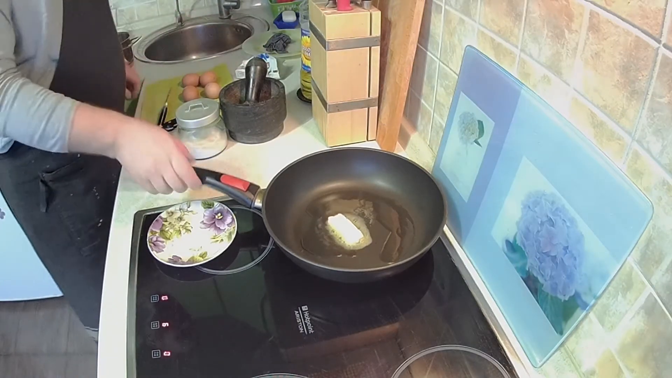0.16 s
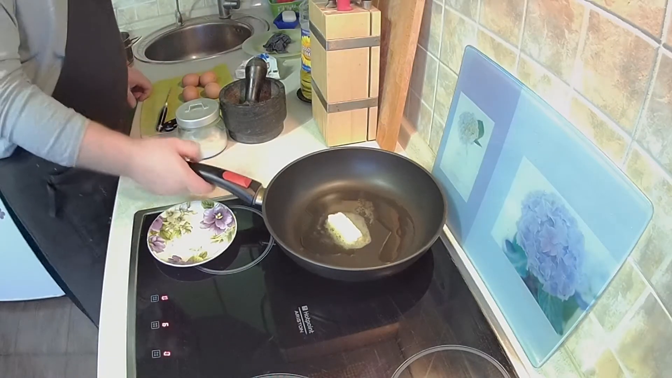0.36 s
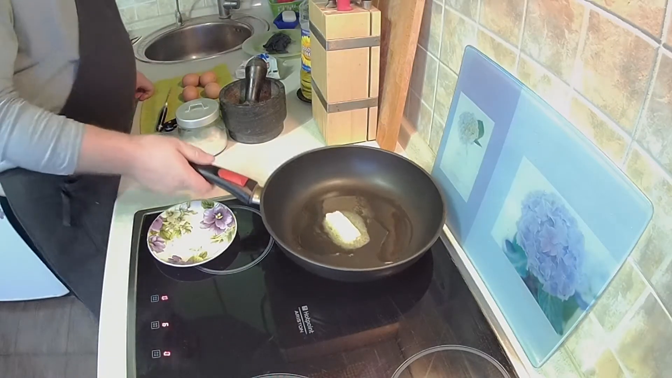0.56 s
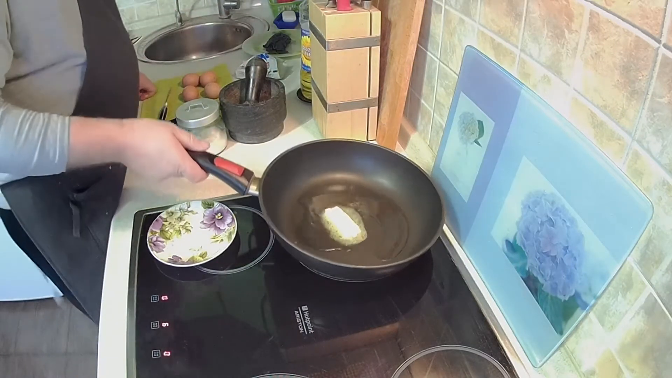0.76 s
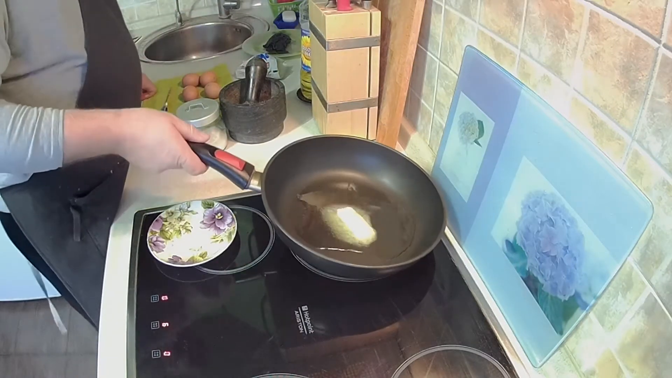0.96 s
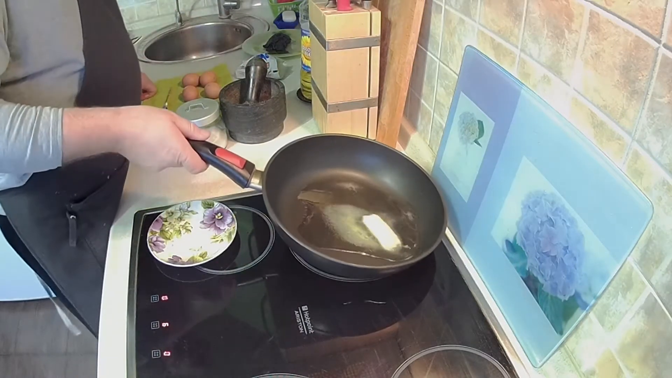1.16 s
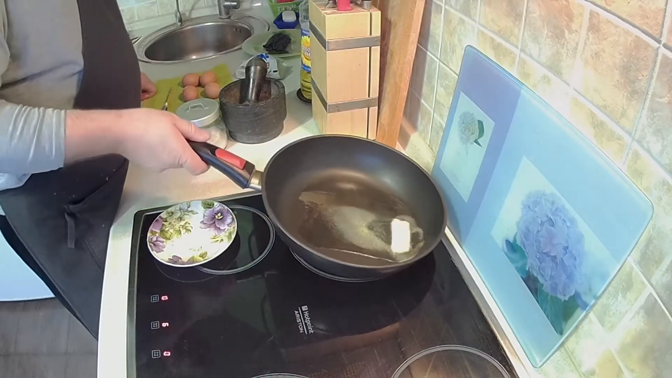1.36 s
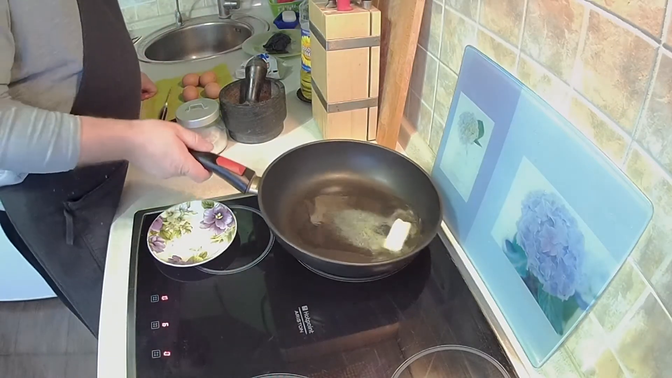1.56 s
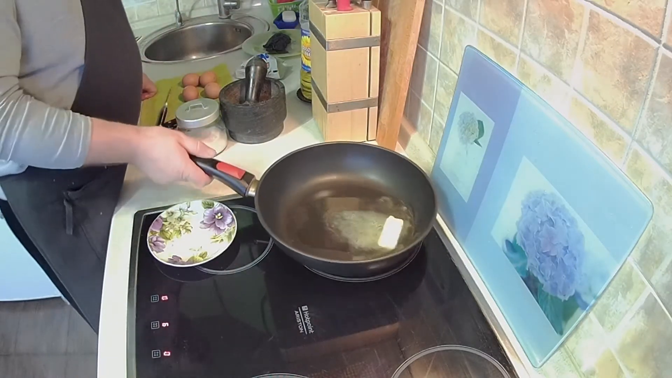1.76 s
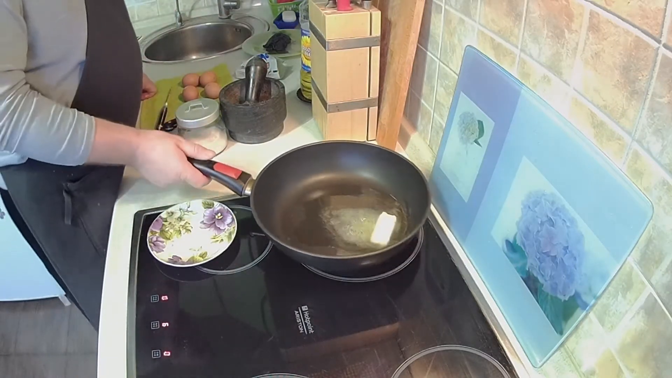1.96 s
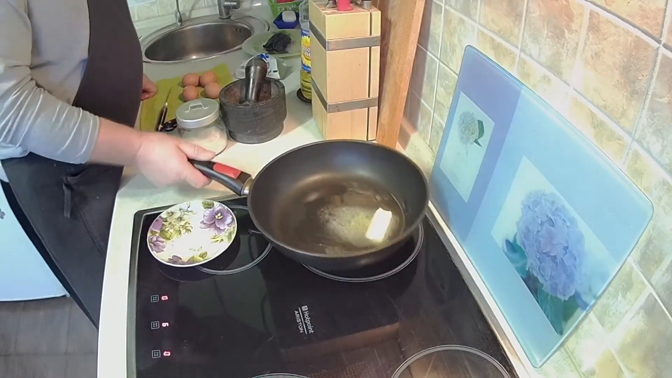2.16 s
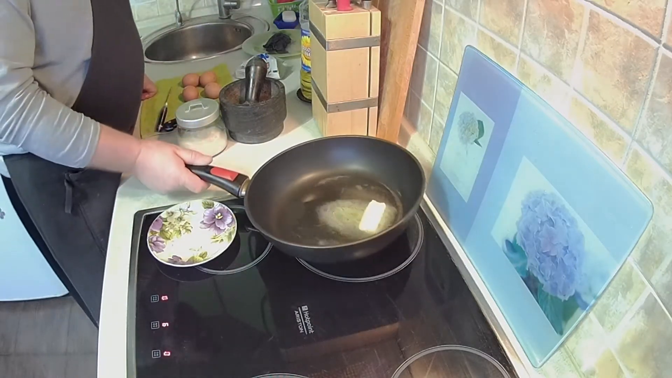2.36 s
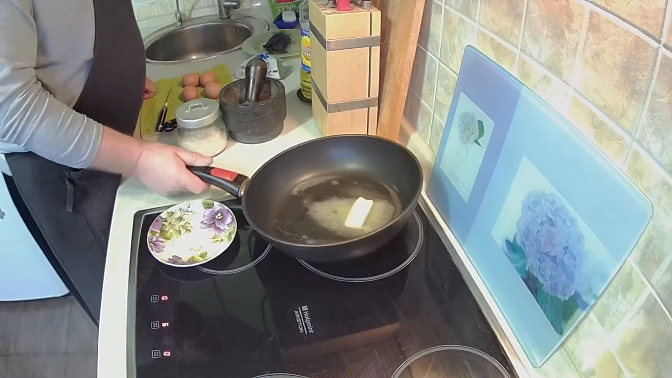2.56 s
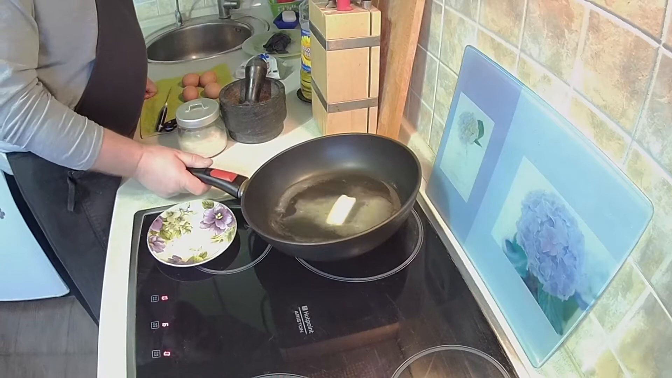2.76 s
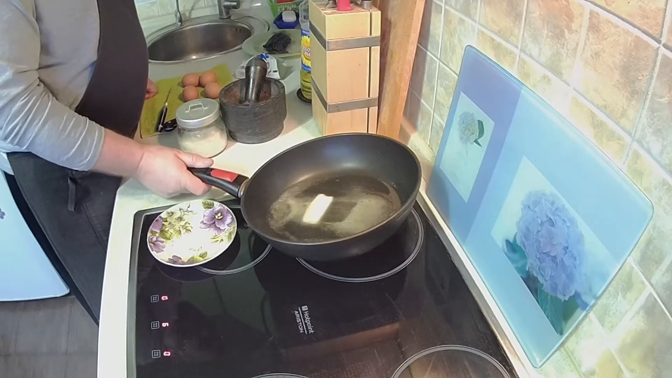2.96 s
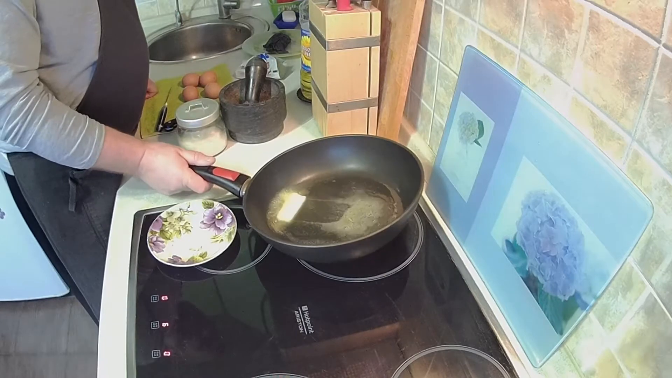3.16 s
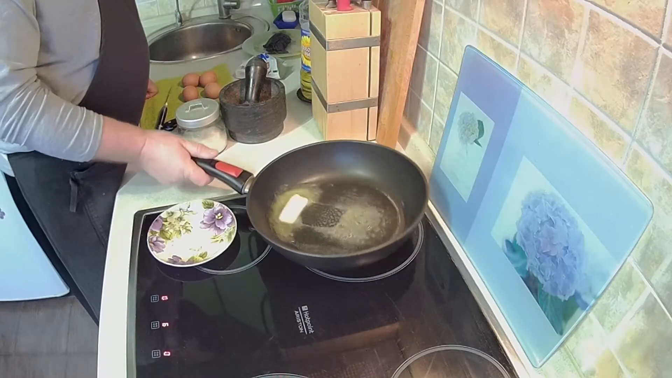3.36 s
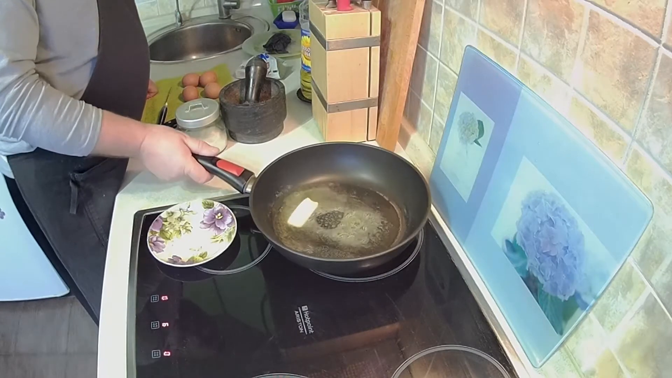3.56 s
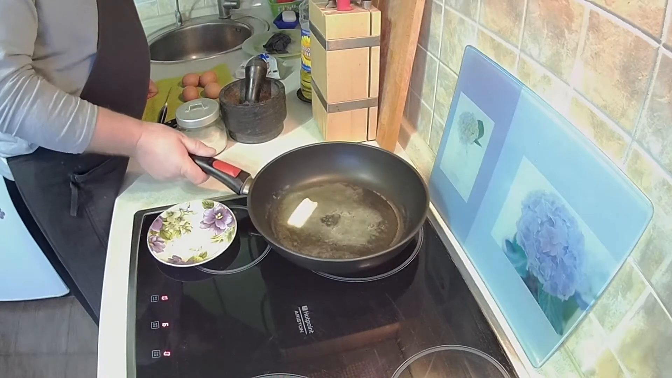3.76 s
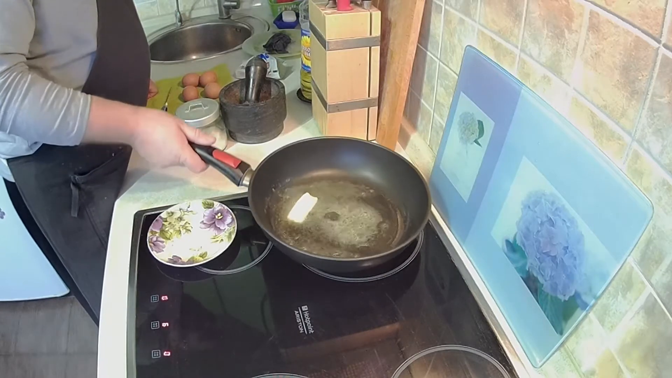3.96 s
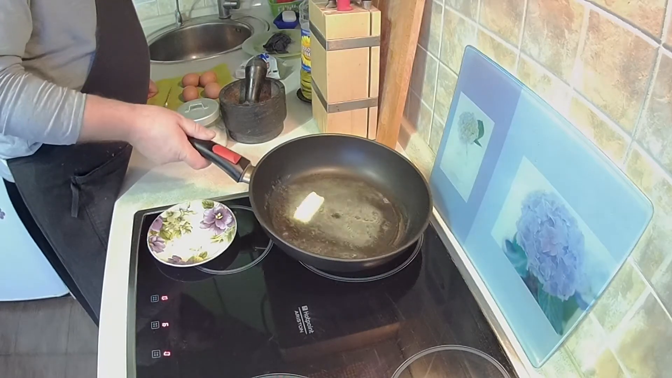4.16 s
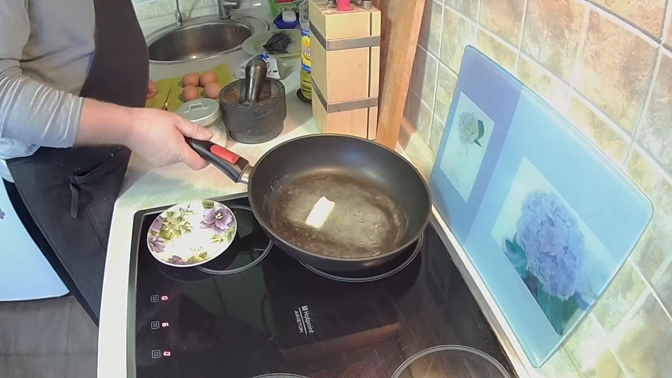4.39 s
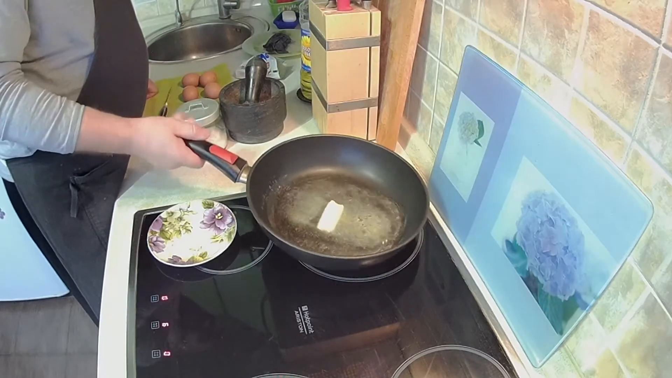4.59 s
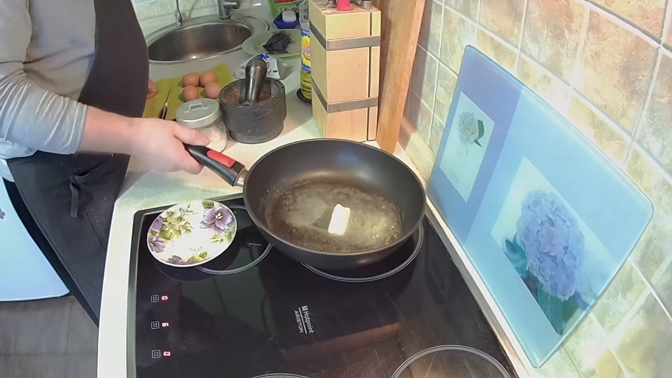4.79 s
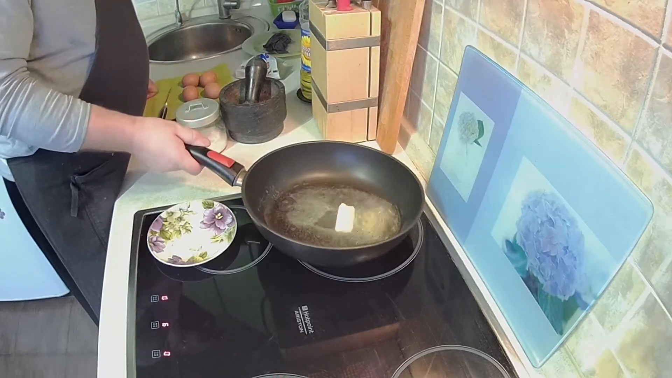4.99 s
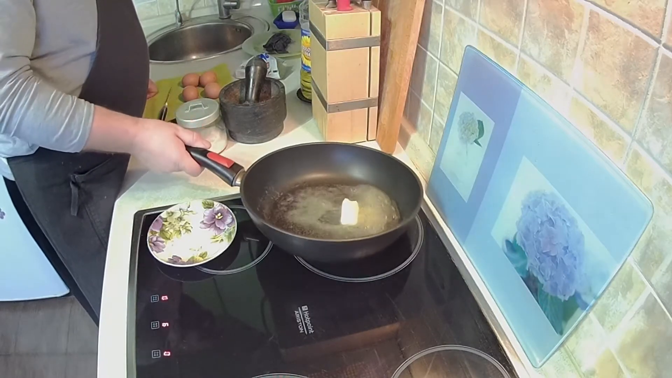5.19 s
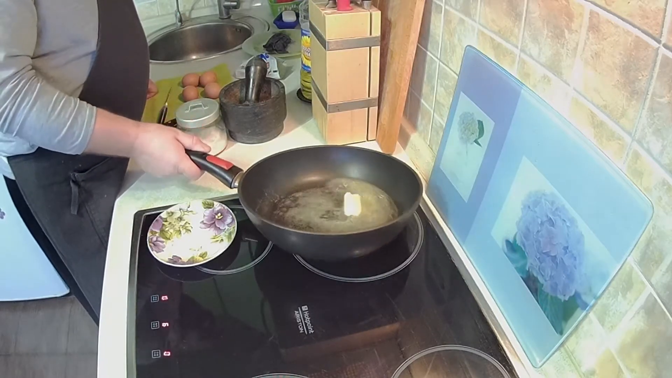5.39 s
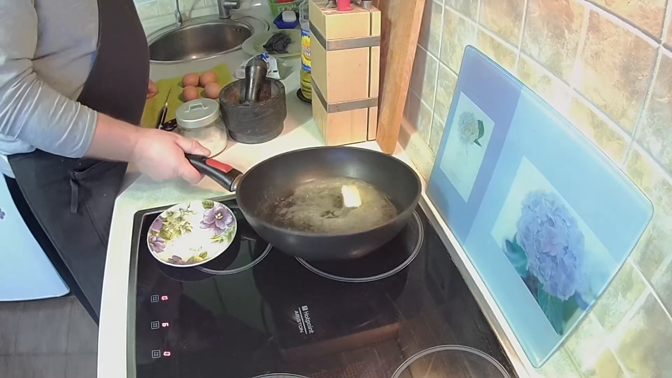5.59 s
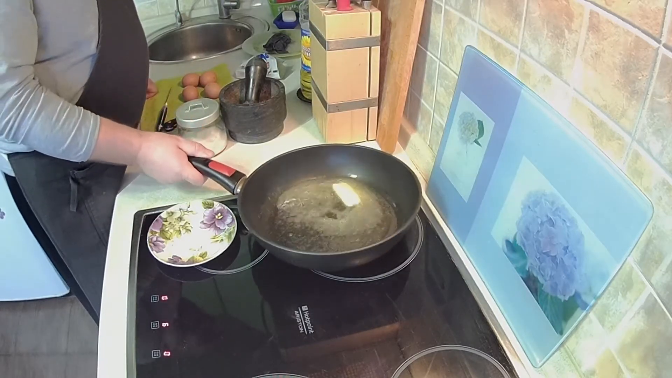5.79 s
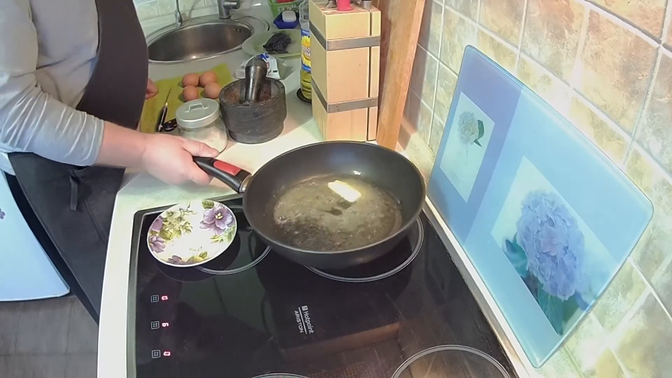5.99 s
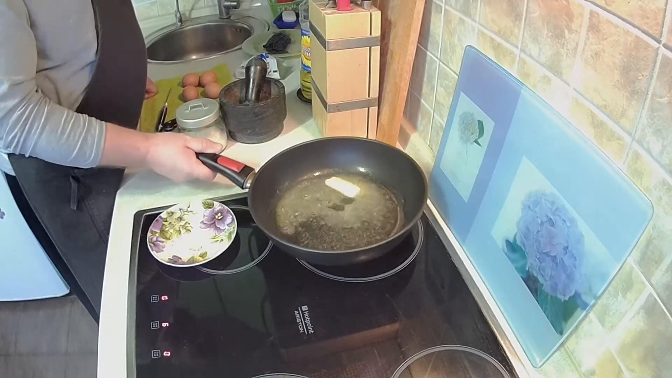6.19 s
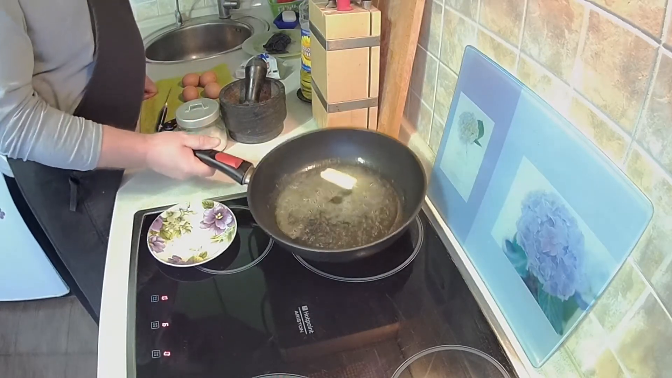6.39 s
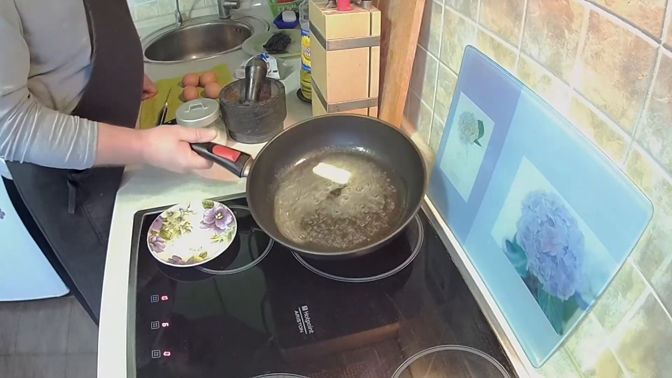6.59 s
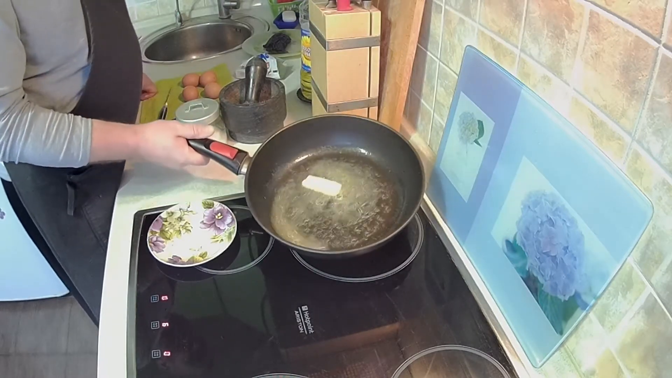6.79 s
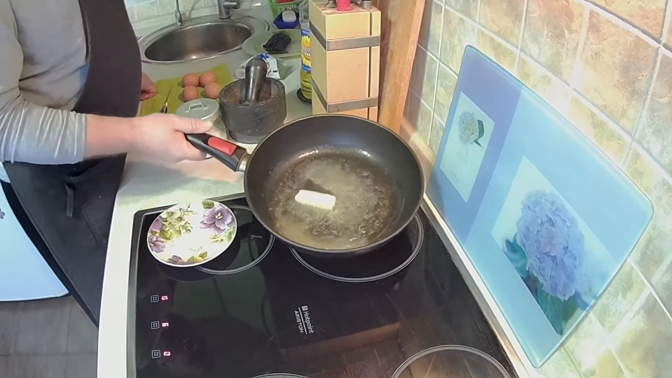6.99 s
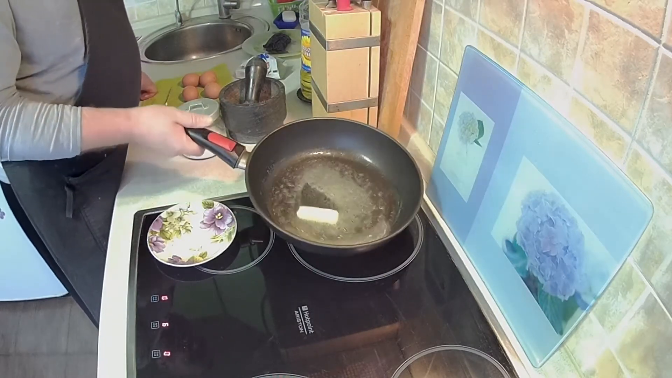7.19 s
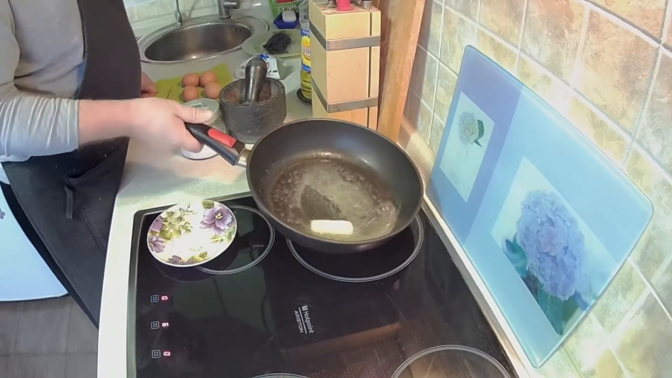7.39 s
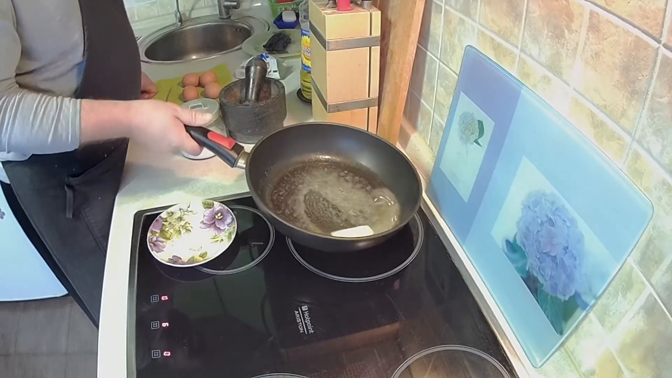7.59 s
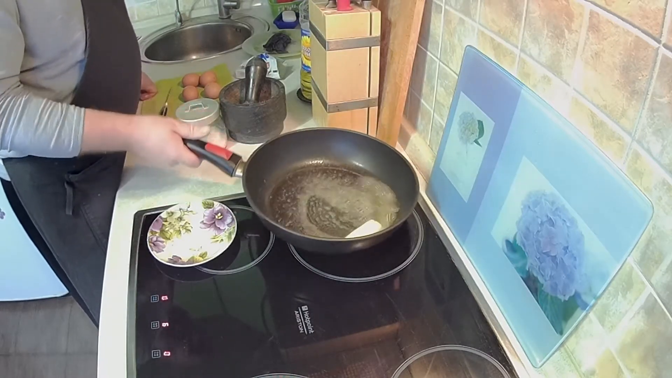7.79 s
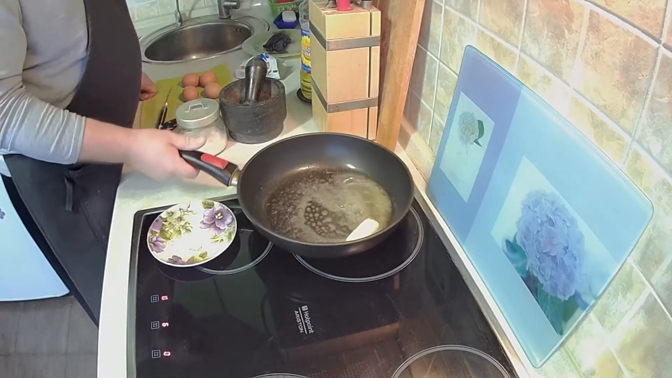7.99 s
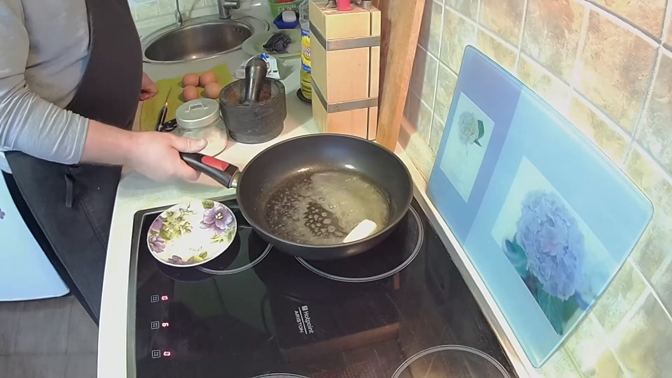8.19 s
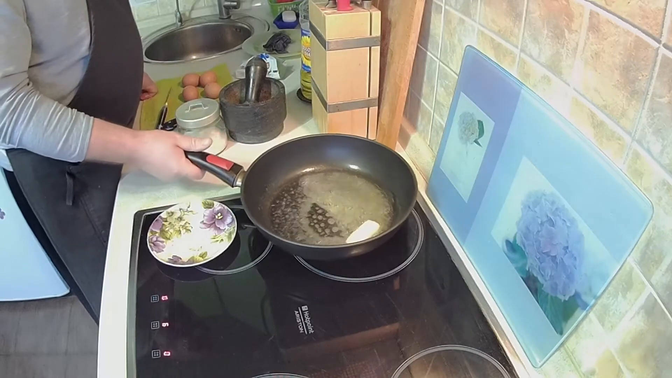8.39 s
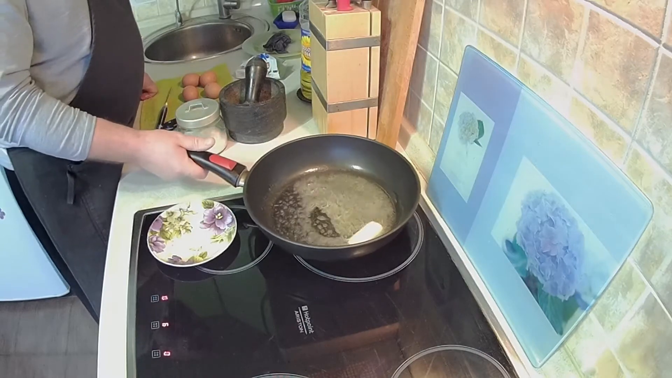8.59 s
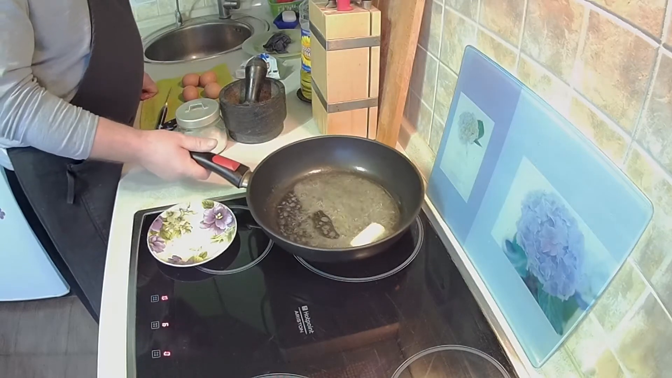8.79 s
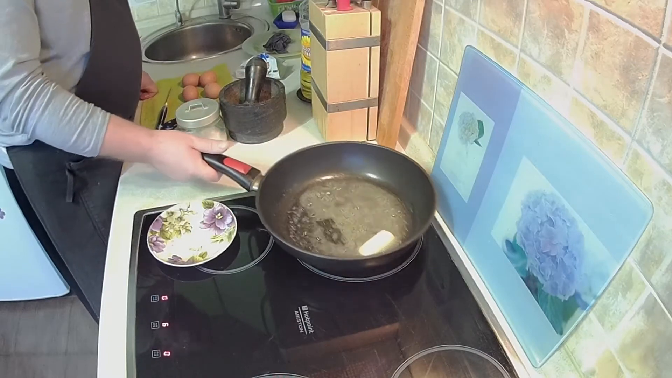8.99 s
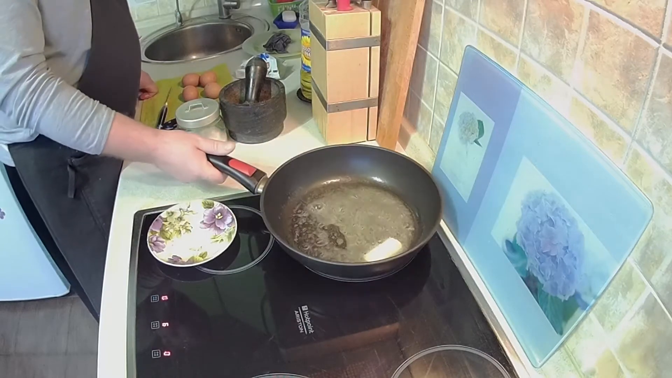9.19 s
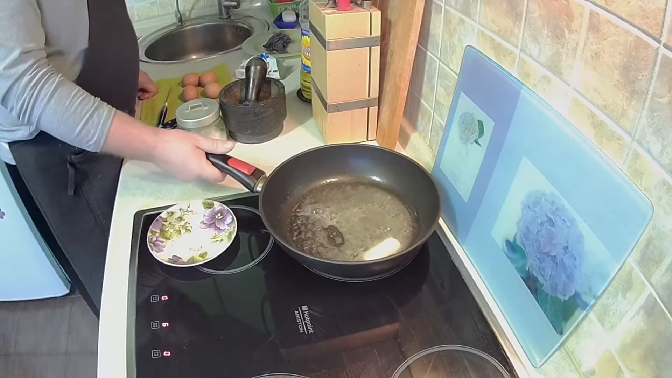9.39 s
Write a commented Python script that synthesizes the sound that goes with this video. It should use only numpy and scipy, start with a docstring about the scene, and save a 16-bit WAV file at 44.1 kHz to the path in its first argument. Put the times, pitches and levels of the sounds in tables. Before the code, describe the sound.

Butter slides and sizzles in a hot pan in a small tiled kitchen, crackling, popping and spitting while the pan scrapes and bumps the hob.

```python
"""Butter begins melting in a hot pan over a glass hob: faint bubble pops, modelled as ringing cavities.
From about 1.2 s it slides onto hot metal: flash boiling adds fizz, crackle and spitting, as filtered random clicks.
The frying flares, lulls and pops harder; meanwhile the pan rubs and bumps, ringing modes of metal and hob.
A lull thins it near 7 s, the loudest pops follow, and a heavy bump comes at 9 s.
Throughout, low handling noise rustles, and a small tiled kitchen adds echoes and a short diffuse tail."""
import sys
import numpy as np
from scipy import signal
from scipy.io import wavfile
from scipy.ndimage import uniform_filter1d, map_coordinates

SR = 44100
rng = np.random.default_rng(int(sys.argv[2]) if len(sys.argv) > 2 else 0)


def bounce(signal):
    """Save signal as a 16-bit WAV file at the path given by the first command-line argument."""
    frames = np.transpose(np.atleast_2d(signal))
    limited = np.clip(frames, -1, 1)
    pcm = np.round(limited * 32767).astype(np.int16)
    wavfile.write(sys.argv[1], SR, pcm)


N = 416744
TIME = np.arange(N) / SR


# spectrum of the pooled fat's bubbles: (frequency [Hz], relative density [dB per Hz])
BUBBLING = [(1300, -60), (1750, -43), (2050, -15.5), (2400, -7), (3050, -22.5), (3500, -7), (4050, 4),
            (4450, 8), (5200, -19.5), (6150, -24), (7000, -54), (8500, -18)]
# resonances of the dish that every burst excites: (frequency [Hz], bandwidth [Hz], relative level [dB])
DISH = [(2670, 670, -10.5), (4460, 380, 7)]
# spectrum of the small bubbles in the froth: (frequency [Hz], relative density [dB per Hz])
FROTH = [(3000, -43.5), (4400, -3.5), (5200, -6.5), (6100, -2), (6600, -7.5), (7200, -12.5), (9000, -26)]


def bubbling():
    """Cavity resonance: large bubbles burst in the pooled fat and ring the dish; small ones burst in froth."""
    breaks = bursts(per_s=3800, spread_db=3.6, clump_db=4.8)
    pool = unit(colour(grains(breaks, low_hz=1826, high_hz=5834, ring_s=0.011), BUBBLING))

    rings = np.zeros(N)
    for hz, width_hz, db in DISH:
        resonator = signal.iirpeak(hz, hz / width_hz, SR)
        rings += amp(db) * unit(signal.lfilter(*resonator, breaks))
    dish_band = signal.butter(4, [1800, 5400], "bandpass", fs=SR, output="sos")
    dish = unit(signal.sosfilt(dish_band, rings))

    froth_breaks = bursts(per_s=2600, spread_db=4.0, clump_db=6.0)
    froth = colour(grains(froth_breaks, low_hz=4560, high_hz=7970, ring_s=0.0063), FROTH)

    large = frying_gain(db=-57.0, boil=0.8, fizz=0.066, flare=1) * steadied(pool)
    ringing = frying_gain(db=-62.5, boil=1.0, fizz=-0.087, flare=1) * steadied(dish)
    small = frying_gain(db=-56.0, boil=1.0, fizz=0.41, flare=0.95) * steadied(froth)
    return large + ringing + small


# spectrum of the crackle: (frequency [Hz], relative density [dB per Hz])
CRACKLE = [(300, -7), (750, -19), (1000, -25), (1400, -5.5), (1750, 4.5), (2100, 2.5), (2400, 5),
           (3080, -4), (3400, 6), (4400, 3.5), (5150, -9), (6100, 9), (7100, -15), (10000, -11)]
# spectrum of the fine fizz: (frequency [Hz], relative density [dB per Hz])
FIZZ = [(3000, -67), (4500, -29), (6100, -22), (7100, -7), (7900, -2.5), (9300, 8), (10600, 0.5),
        (11700, 6), (14100, 5), (15200, 3), (15900, -43)]
BUSY_SHARE = 0.93  # harder frying bursts more often: dB of rate for each dB of level
TICK_SHARE = 1.15  # spray ticks against the fine bubbles
FIZZ_SWAY_DB, FINEST_FLICKER_DB = 1.1, 2.2  # rms swing of the whole fizz, and of the hiss's top
CRACKLE_TOP_HZ = 7400  # without fresh butter on the metal the crackle loses its top
FINEST_HZ, FINEST_SHARE = 10500, 0.36  # weak hiss is duller: its top falls by this many dB more per dB


def sizzle():
    """Flash boiling: water turns to steam on the metal as wide crackle, fine bubble hiss and ticks of spray."""
    boil_db, fizz_db = curve(BOILING) - STEADY_BOIL_DB, curve(FIZZING) - STEADY_FIZZ_DB
    boil_rate = amp(BUSY_SHARE * np.clip(boil_db, -8, 8))
    fizz_rate = amp(BUSY_SHARE * np.clip(fizz_db, -3, 8))

    coarse = unit(bursts(per_s=4200 * boil_rate, spread_db=2.9, clump_db=5.2))
    fine_breaks = bursts(per_s=12000, spread_db=2.4, clump_db=1.5)
    fine = grains(fine_breaks, low_hz=5180, high_hz=16040, ring_s=0.003)
    spray = bursts(per_s=900 * fizz_rate, spread_db=4.0, clump_db=2.0)
    ticks = steadied(droplets(spray))

    crackle = steadied(colour(steadied(coarse) + 0.29 * ticks, CRACKLE))
    crackle *= frying_gain(db=-57.5, boil=0.87, fizz=0.65, flare=3.9)
    fizz = steadied(colour(fine + TICK_SHARE * ticks, FIZZ))
    fizz *= frying_gain(db=-47.5, boil=0, fizz=1.0, flare=0.13)
    fizz *= spurting() * amp(FIZZ_SWAY_DB * drift(per_s=5.4))

    weak_db = np.minimum(fizz_db, 0)
    hiss = fizz + shelf(crackle, CRACKLE_TOP_HZ, 0, weak_db)
    flicker_db = FINEST_FLICKER_DB * drift(per_s=80)
    return shelf(hiss, FINEST_HZ, 0, FINEST_SHARE * weak_db + flicker_db)


def droplets(clicks):
    """Impulse and decaying noise: each droplet explodes with a click, and its spray hisses a moment longer."""
    power = signal.lfilter([1], [1, -np.exp(-1 / (0.00052 * SR))], clicks ** 2)
    return clicks + 0.27 * np.sqrt(power) * rng.standard_normal(N)


SPURTS_PER_S, SPURT_S = 45, 0.006  # mean rate, and decay time of the power
SPURT_SPREAD_DB, SPURT_DB = 3.2, -2  # spread of sizes, and the smallest size against the even hiss


def spurting():
    """Amplitude modulation: an even gain with a flash at every spurt of steam, sudden and quick to die."""
    size = amp(SPURT_DB + SPURT_SPREAD_DB * np.minimum(rng.exponential(1, N), 3.5))
    spurts = size * (rng.random(N) < SPURTS_PER_S / SR)
    power = signal.lfilter([1], [1, -np.exp(-1 / (SPURT_S * SR))], spurts ** 2)
    return unit(np.sqrt(1 + power))


# the largest bubbles bursting: (time [s], direct peak level [dB], starting pitch [Hz])
POPS = [(0.1377, -35, 4370), (0.2886, -39, 4470), (0.3372, -42, 4510), (0.544, -45, 6300),
        (0.562, -42, 4350), (0.603, -50, 2350), (0.668, -46, 4360), (0.736, -44, 4250), (0.7936, -41, 4370),
        (0.8631, -43, 3890), (0.91, -44, 3950), (0.943, -42, 3870), (0.9923, -45, 4280),
        (1.5961, -40, 4400), (1.7937, -43, 4090), (1.8585, -37, 4130), (2.373, -32, 4750),
        (3.2576, -28, 5940), (3.5054, -29, 4200), (3.8128, -19, 4310), (3.9005, -26.5, 6000),
        (4.0088, -26, 4700), (4.3688, -25, 6140), (4.6668, -30, 4500), (4.6878, -25, 4490),
        (5.287, -30, 5880), (5.7513, -32, 3560), (5.7675, -33, 3900), (5.7705, -32, 3500),
        (5.783, -22, 4000), (5.915, -34, 2440), (6.3586, -31, 3890), (6.4188, -27, 5860),
        (7.0642, -35, 4580), (7.1523, -15.5, 3814), (7.621, -24, 6110), (7.7484, -23, 4400),
        (8.0862, -26, 3280), (8.1325, -14.5, 4450), (8.478, -20, 4020), (8.5623, -28, 4640),
        (8.8897, -30, 5090), (9.1146, -27, 4720), (9.116, -34, 2300), (9.3545, -27, 4650)]
# spectrum of the skin's snap: (frequency [Hz], relative density [dB per Hz])
SNAP = [(1000, -25), (2000, 2), (3000, -1), (4300, 13), (5200, 4), (6200, 5), (7200, -7), (10000, -28),
        (16000, -100)]
POP_CYCLES = 28  # the ring time in cycles of the pitch, so low bubbles last longer
SNAP_DB, SNAP_S = -4, 0.0026  # the tearing skin: level against the pip, and decay time


def pops():
    """Cavity resonance and rupture: each large bubble gives a pitched pip and a snap of its tearing skin."""
    out, t = np.zeros(N), TIME[:SR // 25]
    for s, db, hz in POPS:
        noise = rng.standard_normal(len(t))
        snap = topped(colour(noise * np.exp(-t / SNAP_S), SNAP))
        pip = topped(bubble(hz, POP_CYCLES / hz, glide=0.058))
        add(out, s, amp(db) * topped(pip + amp(SNAP_DB) * snap))
    return out


# the loudest droplets of water spitting: (time [s], level [dB] of the blast's peak before body and lulls)
SPITS = [(1.2331, -38), (1.3079, -37), (1.3688, -36), (2.066, -31), (2.155, -30), (2.266, -30),
         (2.3785, -26), (2.7754, -29), (3.3084, -25), (3.699, -22), (3.8045, -24), (3.9215, -19),
         (3.945, -21), (4.0455, -21.5), (4.0775, -24), (4.1055, -22.5), (4.2223, -25), (4.4009, -23),
         (4.416, -23), (5.3117, -28), (5.448, -28), (5.8112, -27), (6.504, -28), (6.6079, -24),
         (6.6297, -27), (6.8523, -20.5), (6.9581, -25.5), (7.1949, -25), (7.3148, -25), (7.52, -27),
         (7.672, -26), (8.1657, -27), (8.6058, -26), (9.3754, -31)]
SPRAY_S = 0.006  # decay time


def spits():
    """Explosive vaporization: a blast and its longer spray, with a little body where the fat is boiling."""
    out, t = np.zeros(N), TIME[:SR // 40]
    for s, db in SPITS:
        envelope = np.exp(-t / 0.0005) + 0.33 * np.exp(-t / SPRAY_S)
        blast = rng.standard_normal(len(t)) * envelope
        boil_db = np.interp(s, *np.transpose(BOILING)) - STEADY_BOIL_DB
        body = 0.27 * amp(min(boil_db, 0)) * topped(colour(blast, CRACKLE))
        add(out, s, amp(db) * topped(topped(colour(blast, FIZZ)) + body))
    return out


# water breaks out of the butter and the frying flares: (time [s], rise [dB] before each layer's share)
FLARES = [(1.593, 6), (2.057, 2.5), (3.255, 2.5), (4.68, 1.1), (5.912, 1.5), (7.15, 3)]
FLARE_S = 0.1  # decay time


def flaring():
    """Transient excitation: each flare starts at once and dies away exponentially; in dB."""
    return sum(db * (TIME >= s) * np.exp(-abs(TIME - s) / FLARE_S) for s, db in FLARES)


# boiling of the pooled fat, read against its steady level: (time [s], level [dB])
BOILING = [(0, -54.5), (0.35, -58), (0.48, -63.5), (0.65, -58), (0.95, -62), (1.12, -79.5), (1.5, -76.5),
           (1.8, -60.5), (2.35, -47.5), (3.1, -56.5), (3.65, -47.5), (4.05, -43.5), (4.65, -49.5),
           (4.9, -50), (5.55, -53.5), (5.9, -51.5), (6.6, -49.5), (7.0, -51.5), (7.25, -52.5), (7.85, -52),
           (8.45, -48.5), (9.45, -45)]
# fine sizzle as butter slides onto hot metal, read against its steady level: (time [s], level [dB])
FIZZING = [(0, -66.5), (0.3, -86), (1.02, -77), (1.24, -49.5), (2.1, -48.5), (2.45, -50), (3.2, -52),
           (3.7, -42), (4.4, -42.5), (4.8, -47.5), (5.3, -46.5), (5.65, -51.5), (6.0, -48.5), (6.65, -46),
           (7.05, -52.5), (7.22, -47.5), (7.7, -44), (8.2, -50.5), (8.65, -51), (8.97, -62.5), (9.15, -52),
           (9.45, -60.5)]
STEADY_BOIL_DB, STEADY_FIZZ_DB = -52, -47


def frying_gain(db, boil, fizz, flare):
    """Level superposition: a steady level in dB, plus shares of the boiling, fizzing and flares, as a gain."""
    boil_db = boil * (curve(BOILING) - STEADY_BOIL_DB)
    fizz_db = fizz * (curve(FIZZING) - STEADY_FIZZ_DB)
    return amp(db + boil_db + fizz_db + flare * flaring())


# fat runs off the hot spot and deeper bubbles die away: (middle time [s], half length [s], level [dB])
LULLS = [(0.457, 0.033, -11), (3.214, 0.015, -2), (6.92, 0.5, -14.5), (8.746, 0.22, -7.5)]
# the level below 4.2 kHz drops out briefly: (middle time [s], level [dB])
DROPOUTS = [(5.886, -32), (7.094, -33), (7.791, -57)]
LULL_BELOW_HZ, DROPOUT_BELOW_HZ = 3150, 4200
DROPOUT_S = 0.017  # half length


def lulled(x):
    """Low-shelf attenuation: in a lull only the high, small bubbles carry on; below 4.2 kHz the level also
    drops out briefly."""
    lull_db = sum(db * swell(s, half_s) for s, half_s, db in LULLS)
    dropout_db = sum(db * swell(s, DROPOUT_S) for s, db in DROPOUTS)
    return shelf(shelf(x, LULL_BELOW_HZ, lull_db, 0), DROPOUT_BELOW_HZ, dropout_db, 0)


# gain of a narrow band near 3 kHz over time, below 0 a hollow: (time [s], level [dB])
HOLLOW_GAIN = [(1.2, -29), (1.8, 10.5), (2.4, -22), (3.1, -34), (3.7, -1), (4.5, -1), (5.5, -2), (6.05, 7),
               (6.3, 13), (7.6, 5.5), (9.0, 6)]
HOLLOW_HZ, HOLLOW_WIDTH_HZ = 3047, 360


def hollowed(x):
    """Notch filtering: a narrow band near 3 kHz is weakened or strengthened over time."""
    notch = signal.iirnotch(HOLLOW_HZ, HOLLOW_HZ / HOLLOW_WIDTH_HZ, SR)
    notched = signal.filtfilt(*notch, x)
    return notched + amp(curve(HOLLOW_GAIN)) * (x - notched)


# scrapes as the pan is turned: (middle time [s], half length [s], level [dB], pitch of the contact [Hz])
SCRAPES = [(0.023, 0.067, -68, 560), (0.357, 0.24, -81, 715), (0.64, 0.059, -73.5, 1230),
           (0.79, 0.13, -67.5, 2280), (1.757, 0.027, -76, 406), (2.005, 0.12, -74, 700),
           (2.385, 0.15, -59, 1470), (2.657, 0.014, -54, 1300), (2.827, 0.17, -64, 1220),
           (3.356, 0.25, -59, 1380), (4.593, 0.086, -69.5, 427), (4.96, 0.044, -62, 440),
           (5.175, 0.11, -69.5, 432), (5.48, 0.081, -65, 423), (5.734, 0.035, -69.5, 376),
           (6.044, 0.088, -68.5, 394), (6.31, 0.075, -68.5, 380), (6.474, 0.015, -44.5, 1080),
           (6.51, 0.054, -64, 1110), (7.25, 0.072, -61.5, 1300), (7.676, 0.06, -71, 586),
           (7.945, 0.091, -66, 620), (8.982, 0.03, -65, 505), (9.136, 0.18, -63, 520)]
# spectrum of the rubbed metal: (frequency [Hz], relative density [dB per Hz])
METAL = [(250, 1.5), (440, -7.5), (690, -12.5), (950, -19.5), (1270, 0), (1550, -11), (2350, 3.5),
         (3000, -14), (4500, -48)]
RUB_DAMPING = 0.73  # pressed against the hob, the pan rings for only this share of its free time


def rubbing():
    """Stick-slip excitation: tiny slips and rattles ring the pan as it scrapes, and under hard frying."""
    slips = unit(bursts(per_s=2500, spread_db=1.6, clump_db=7.5))
    t = TIME[:SR // 4]
    ring = sum(amp(db - 60 * t / (RUB_DAMPING * t60)) * np.sin(2 * np.pi * hz * t) for hz, db, t60 in PAN)
    ringing = unit(signal.oaconvolve(slips, ring)[:N])
    body = wandering(ringing + 1.4 * unit(colour(slips, METAL)))

    scraped = np.zeros(N)
    for s, half_s, db, hz in SCRAPES:
        scraped += amp(db) * swell(s, half_s) * steadied(contact(body, hz))
    rattle_gain = frying_gain(db=-84.5, boil=2.5, fizz=1.64, flare=0)
    return scraped + rattle_gain * steadied(contact(body, hz=860))


RUB_WANDER = 0.05  # rms share by which the pitches wander as the point of contact moves


def wandering(x):
    """Time warping: a wandering reading speed makes all the pitches of a sound drift together."""
    place = np.cumsum(1 + RUB_WANDER * drift(per_s=7))
    return map_coordinates(x, [place], order=1, mode="mirror")


# bumps of pan and handle: (time [s], thud level [dB], thud pitch [Hz], metal ring level [dB],
# clack level [dB], pitch of the contact [Hz])
KNOCKS = [(0.246, -39.5, 61.5, -78, -70, 367), (0.289, -39, 124, -51, -56, 300),
          (1.931, -42, 117, -42, -33, 1060), (2.041, -31, 82, -49, -49, 420),
          (2.28, -67, 119, -48, -40.5, 1700), (3.513, -29, 74.5, -68, -66, 373),
          (3.553, -36, 64.5, -59, -62, 400), (4.474, -42.5, 112, -62, -63, 400),
          (4.764, -42, 135, -47, -46, 395), (4.801, -40, 90, -47, -51, 334),
          (5.355, -50, 150, -58, -68, 330), (6.099, -45, 135, -53.5, -70, 340),
          (6.159, -45, 64, -77, -75, 400), (6.404, -41.5, 108, -56, -68, 248),
          (6.473, -52, 148, -54, -60, 504), (7.289, -45.5, 95, -81, -78, 400),
          (8.163, -37.5, 163, -30, -34, 624), (8.176, -30.5, 81, -54, -54, 400),
          (9.012, -38, 52, -41, -58, 352), (9.031, -20.5, 58.7, -33, -43, 370)]
# free modes of the pan before the contact's filter: (frequency [Hz], relative level [dB], t60 [s])
PAN = [(209, 2.5, 0.19), (260.5, 0, 0.12), (338, -10, 0.11), (440, 5, 0.093), (536, -6, 0.1),
       (674, 3, 0.075), (749, -4, 0.13), (943, -1.5, 0.068), (1155, -2, 0.11), (1289, -4.5, 0.09),
       (1430, -2.5, 0.066), (1760, -11, 0.16), (2040, 9.5, 0.054), (2323, 10, 0.11)]
# spectrum of the loose handle and cooker top: (frequency [Hz], relative density [dB per Hz])
SHUDDER_COLOUR = [(60, -11), (170, 2.5), (300, 0.5), (370, -10), (450, -6.5), (550, -12), (660, -7.5),
                  (850, -14), (1050, -19), (1200, -16), (1700, -12), (3500, -41)]
CLACK_S = 0.005  # decay time
SHUDDER_DB, SHUDDER_S = -5, 0.032  # level against the ring, and decay time


def knocks():
    """Impact excitation of modes: each bump gives a short clack, the pan's damped ring and a dull shudder."""
    out, t = np.zeros(N), TIME[:SR // 2]
    for s, _, _, ring_db, clack_db, contact_hz in KNOCKS:
        ring = np.zeros(len(t))
        for hz, db, t60 in PAN:
            ring += amp(db - 60 * t / t60) * np.sin(2 * np.pi * (hz * t + rng.random()))
        clack_colour = [(contact_hz / 3, -3), (contact_hz, 0), (contact_hz * 3.6, -8), (contact_hz * 6, -40)]
        clack = colour(rng.standard_normal(len(t)) * np.exp(-t / CLACK_S), clack_colour)
        shudder = colour(rng.standard_normal(len(t)) * np.exp(-t / SHUDDER_S), SHUDDER_COLOUR)
        body = topped(contact(ring, contact_hz)) + amp(SHUDDER_DB) * topped(shudder)
        onset = 1 - np.exp(-t * contact_hz)
        add(out, s, onset * (amp(ring_db) * body + amp(clack_db) * topped(clack)))
    return out


def contact(x, hz):
    """Contact stiffness: the harder the contact, the higher the modes that it wakes."""
    return colour(x, [(hz / 4, -14), (hz / 1.17, -6), (hz, 0), (hz * 1.92, -9), (hz * 7, -44)])


# booming modes of the cooker before their nearness to the thud: (frequency [Hz], level to thud [dB], t60 [s])
HOB = [(49.65, -11, 0.55), (73, -19, 0.6), (142, -17, 0.41)]
HOB_REACH_OCTAVES = 1  # a mode this far from the thud's pitch is woken half as much
THUD_OVERTONE, THUD_OVERTONE_DB = 1.84, -13.5  # second bending mode: pitch ratio and level


def thuds():
    """Bending modes and sympathetic resonance: a bump shoves the hob, and the cooker booms on under it."""
    out, t = np.zeros(N), TIME[:SR * 3 // 4]
    for s, thud_db, thud_hz, _, _, _ in KNOCKS:
        angle = 2 * np.pi * thud_hz * t
        flex = np.sin(angle) + amp(THUD_OVERTONE_DB) * np.sin(THUD_OVERTONE * angle)
        thud = topped((1 - np.exp(-t / 0.0035)) * np.exp(-t / 0.0074) * flex)
        boom = np.zeros(len(t))
        for hz, db, t60 in HOB:
            nearness = 1 / (1 + (np.log2(hz / thud_hz) / HOB_REACH_OCTAVES) ** 2)
            boom += nearness * amp(db - 60 * t / t60) * np.sin(2 * np.pi * hz * t)
        add(out, s, amp(thud_db) * (thud + (1 - np.exp(-t / 0.051)) * boom))
    return out


# the pan being moved about: (time [s], level [dB] before a 2.1 dB cut)
HANDLING = [(0, -58.5), (0.85, -57.5), (1.5, -67), (1.95, -56), (3.1, -57), (4.9, -55), (5.7, -58),
            (6.4, -54), (6.8, -64.5), (7.3, -60.5), (7.65, -76), (8.1, -61), (8.7, -85), (9.45, -73)]
# spectrum of the cook's movements: (frequency [Hz], relative density [dB per Hz])
RUMBLE = [(12, -5), (20, 9), (128, 2.5), (163, 2.5), (198, 0.5), (358, -8.5), (441, -22), (640, -31.5),
          (700, -60), (910, -75), (1540, -120)]
# spectrum of the quiet room: (frequency [Hz], relative density [dB per Hz])
QUIET = [(20, 17), (120, 13), (350, -36.5), (700, -11), (2000, -30.5), (6000, -57), (16000, -66)]


def rumble():
    """Filtered noise: low rustle and soft lumps of the cook's movements, over the quiet of the room."""
    lumps = unit(bursts(per_s=82, spread_db=0.5, clump_db=0.5))
    moving = steadied(colour(0.99 * rng.standard_normal(N) + lumps, RUMBLE))
    quiet = unit(colour(rng.standard_normal(N), QUIET))
    return amp(curve(HANDLING) - 2.1) * moving + amp(-70.5) * quiet


def kitchen(x, tail_db, echo_db, count=6):
    """Multipath propagation: the room's paths keep changing as the pan swings and the bubbles wander."""
    shares = np.array([drift(per_s=9) ** 3 for _ in range(count)])
    shares /= np.linalg.norm(shares, axis=0) + 1e-9
    return x + sum(signal.oaconvolve(x * share, reflections(tail_db, echo_db))[:N] for share in shares)


# decay of the room's tail: (frequency [Hz], t60 [s])
KITCHEN = [(100, 0.6), (500, 0.48), (2000, 0.28), (5000, 0.41), (14000, 0.02)]
# tiles and worktop: (delay [s] before a random 15 % shift, gain relative to the echo level)
ECHOES = [(.0037, 0.7), (0.011, 0.091), (0.013, 0.13), (0.0097, 0.05), (0.0182, 0.075)]


def reflections(tail_db, echo_db):
    """Early reflections and reverberation: close echoes off tiles and worktop, then a short diffuse tail."""
    hz, t, z = signal.stft(rng.standard_normal(SR // 2), SR, nperseg=256)
    decay = amp(-60 * t / read(KITCHEN, hz)[:, None])
    tail = signal.istft(z * decay, SR, nperseg=256)[1]
    tail *= 1 - np.exp(-TIME[:len(tail)] / 0.000066)
    response = amp(tail_db) * tail / np.linalg.norm(tail)
    for delay_s, gain in ECHOES:
        scatter = rng.standard_normal(SR // 3000)
        echo = amp(echo_db) * gain * scatter / np.linalg.norm(scatter)
        add(response, delay_s * rng.uniform(.85, 1.15), echo)
    return response


def bubble(hz, ring_s, glide):
    """Cavity resonance: a burst bubble rings briefly; as the hole opens, pitch and damping rise."""
    t = TIME[:SR // 25]
    turns = hz * (t + glide * (t - ring_s * (1 - np.exp(-t / ring_s))))
    envelope = (1 - np.exp(-t / .0003)) * amp(-60 * (t / ring_s) ** 1.6)
    return envelope * np.sin(2 * np.pi * turns)


def grains(clicks, low_hz, high_hz, ring_s, count=32):
    """Granular superposition: each click rings one cavity, drawn from sizes between two pitches."""
    kind = rng.integers(0, count, N)
    out = np.zeros(N)
    for k, hz in enumerate(np.linspace(low_hz, min(high_hz, SR / 2.4), count)):
        cavity = unit(bubble(hz, ring_s, glide=.05))
        out += signal.oaconvolve(clicks * (kind == k), cavity)[:N]
    return unit(out)


def bursts(per_s, spread_db, clump_db):
    """Random point process: clicks, many small and a few large, swelling in flurries."""
    size = amp(spread_db * np.minimum(rng.exponential(1, N), 4.2))
    flurries = amp(clump_db * np.minimum(drift(per_s=70), 1.4))
    return size * flurries * rng.choice([-1, 1], N) * (rng.random(N) < per_s / SR)


def drift(per_s):
    """Slow random modulation: a wandering line of rms 1 through this many random points a second."""
    return unit(np.interp(TIME * per_s, np.arange(4096), rng.standard_normal(4096)))


def colour(x, spectrum, size=4096):
    """Minimum-phase filtering: a causal filter of the given spectrum keeps the sharp fronts of clicks."""
    level_db = np.maximum(read(spectrum, abs(np.fft.fftfreq(size, 1 / SR))), -100)
    log_gain = np.log(amp(level_db))
    response = np.fft.ifft(np.exp(np.conj(signal.hilbert(log_gain)))).real[:size // 2]
    return signal.oaconvolve(x, response)[:len(x)]


def steadied(x, size=8001):
    """Power normalization: evens out slow swings of power and leaves the fast grain."""
    return x / np.sqrt(abs(uniform_filter1d(x ** 2, size)) + 1e-3 * np.mean(x ** 2))


def shelf(x, hz, low_db, high_db):
    """Zero-phase band splitting: changes the levels below and above a frequency."""
    low = signal.sosfiltfilt(signal.butter(4, hz, fs=SR, output="sos"), x)
    return amp(low_db) * low + amp(high_db) * (x - low)


def swell(middle_s, half_s):
    """Gaussian envelope: a smooth rise and fall of height 1."""
    return np.exp(-((TIME - middle_s) / half_s) ** 2)


def curve(rows):
    """Linear interpolation: a level in dB for every sample."""
    return np.interp(TIME, *np.transpose(rows))


def read(points, hz):
    """Logarithmic frequency scale: interpolates a table along it."""
    f, value = np.transpose(points)
    return np.interp(np.log(hz + 1), np.log(f + 1), value)


def amp(db):
    """Decibel definition: level to amplitude gain."""
    return 10 ** (np.asarray(db) / 20)


def unit(x):
    """Power normalization: scales to rms 1."""
    return x / np.sqrt(np.mean(x ** 2) + 1e-20)


def topped(x):
    """Peak normalization: scales to peak 1."""
    return x / (abs(x).max() + 1e-20)


def add(mix, s, sound):
    """Linear superposition: mixes a sound in at s seconds."""
    part = mix[max(round(s * SR), 0):][:len(sound)]
    part += sound[:len(part)]


def scene():
    """Superposition of sources: the pan, with the kitchen's reflections set apart for each kind of sound."""
    frying = lulled(hollowed(kitchen(bubbling() + sizzle(), tail_db=-19, echo_db=-1.5)))
    bangs = kitchen(pops() + lulled(spits()), tail_db=-11, echo_db=-2)
    metal = kitchen(knocks() + hollowed(rubbing()), tail_db=-9, echo_db=-9, count=1)
    bumps = kitchen(thuds(), tail_db=-12, echo_db=-14, count=1)
    return (frying + bangs + metal + bumps + rumble())[None]


LOW_CUT_HZ, EDGE_HZ = 25, 15850


def record(dry):
    """Band limitation: the microphone loses the deepest bass, and a low-pass removes the extreme treble."""
    lean = signal.sosfilt(signal.butter(2, LOW_CUT_HZ, "highpass", fs=SR, output="sos"), dry)
    low_pass = signal.firwin(511, EDGE_HZ, window=("kaiser", 9), fs=SR)
    return signal.oaconvolve(lean, low_pass[None], "same")


dry = scene()
out = record(dry)
bounce(out)
```